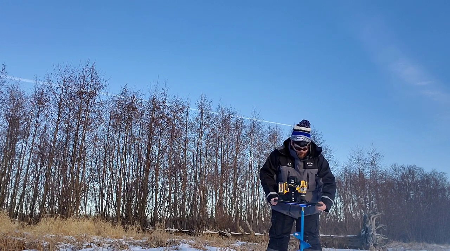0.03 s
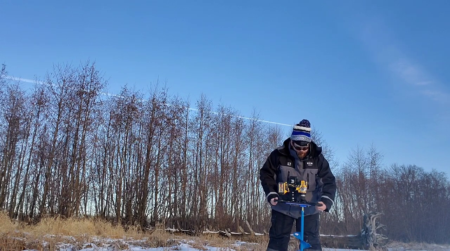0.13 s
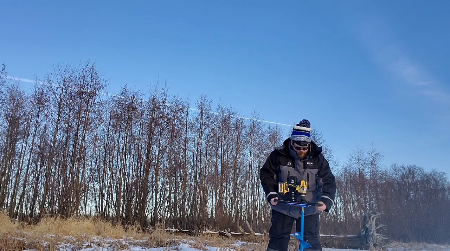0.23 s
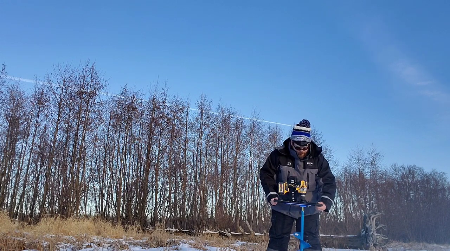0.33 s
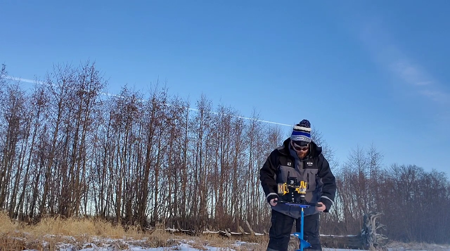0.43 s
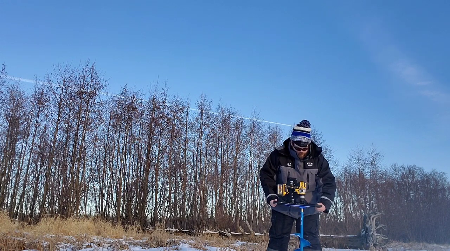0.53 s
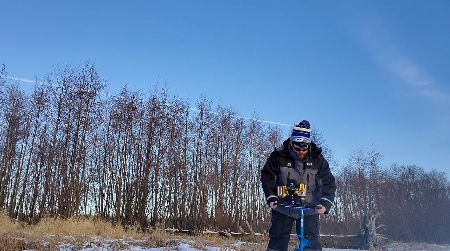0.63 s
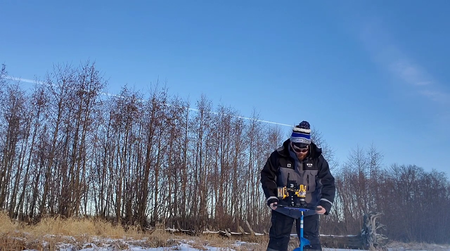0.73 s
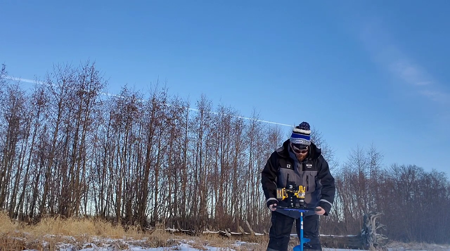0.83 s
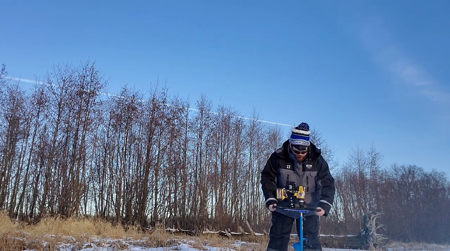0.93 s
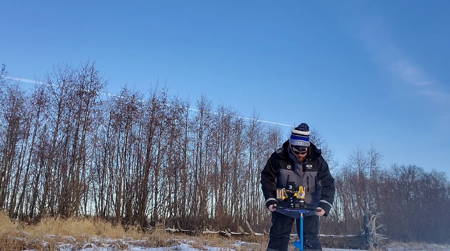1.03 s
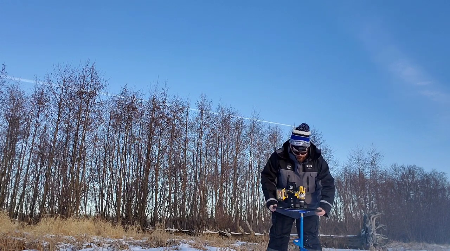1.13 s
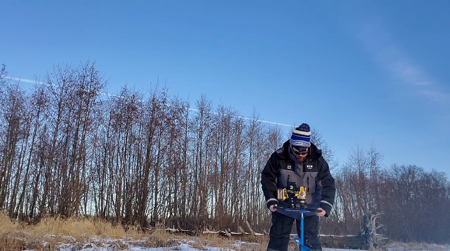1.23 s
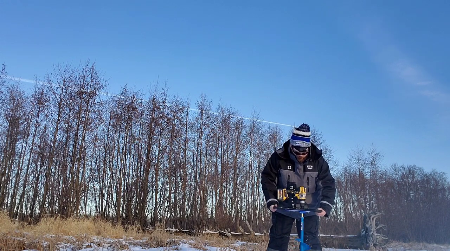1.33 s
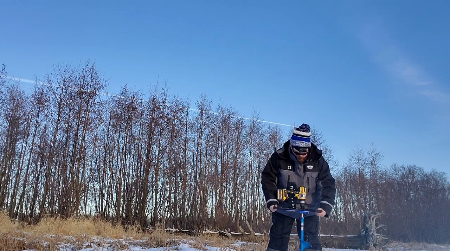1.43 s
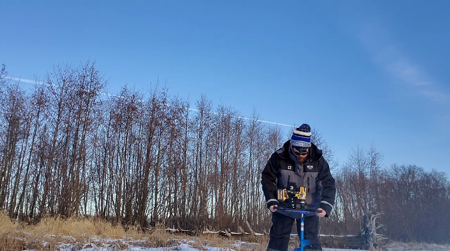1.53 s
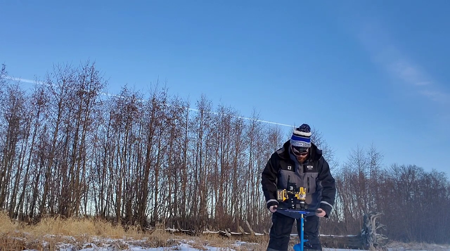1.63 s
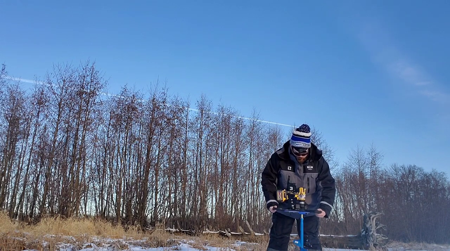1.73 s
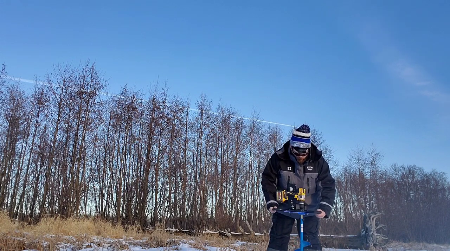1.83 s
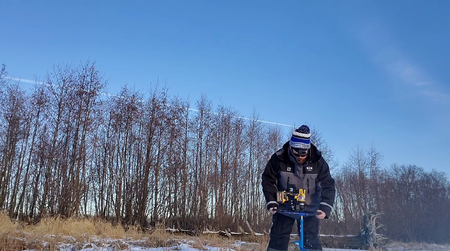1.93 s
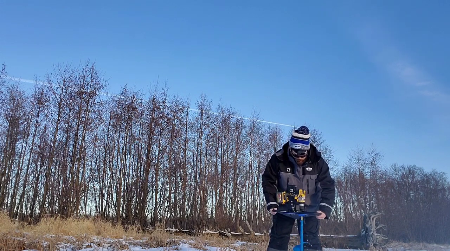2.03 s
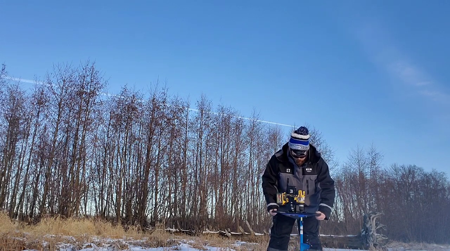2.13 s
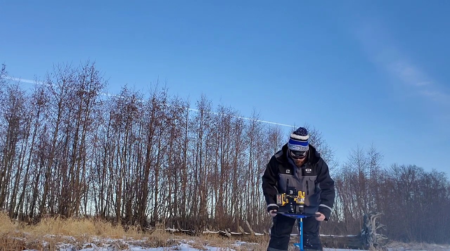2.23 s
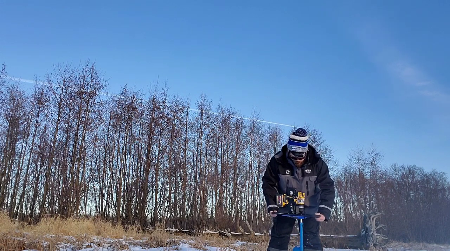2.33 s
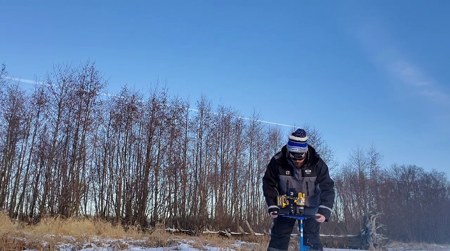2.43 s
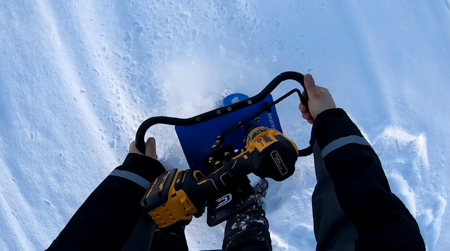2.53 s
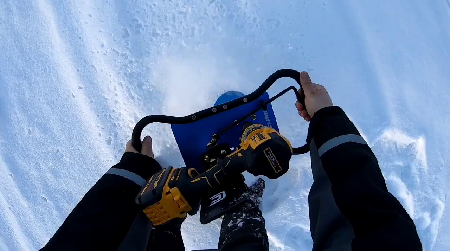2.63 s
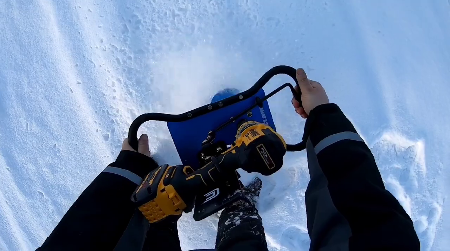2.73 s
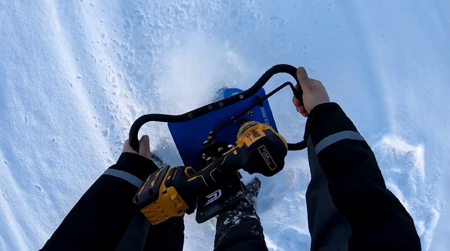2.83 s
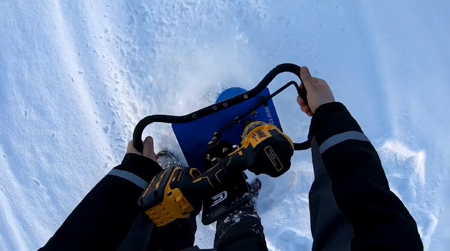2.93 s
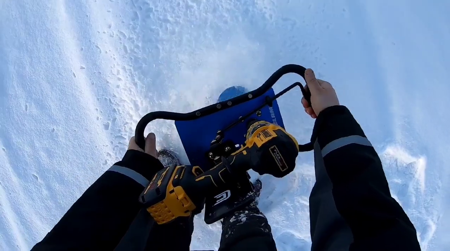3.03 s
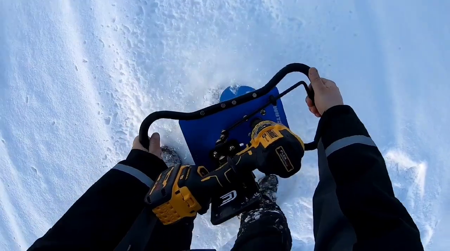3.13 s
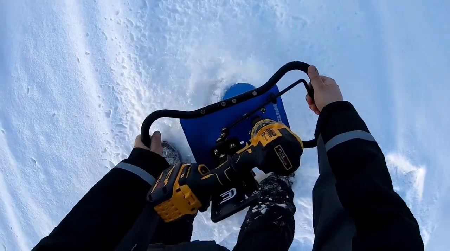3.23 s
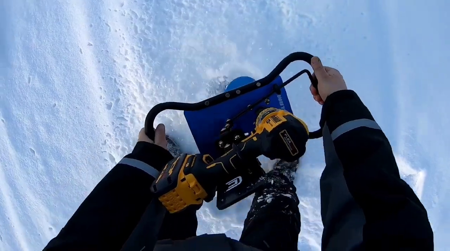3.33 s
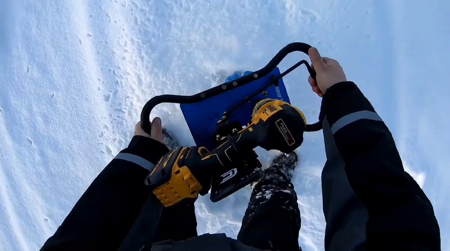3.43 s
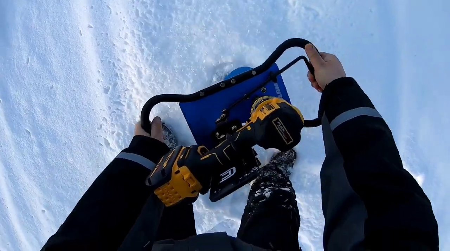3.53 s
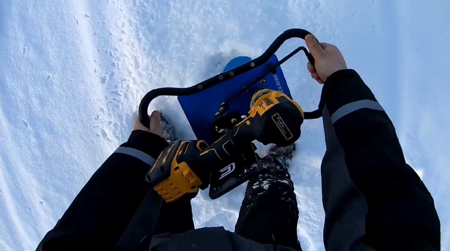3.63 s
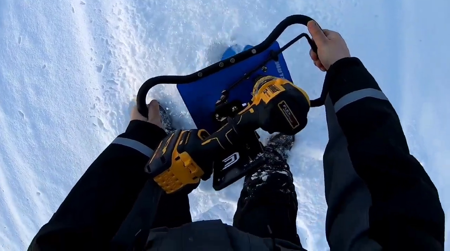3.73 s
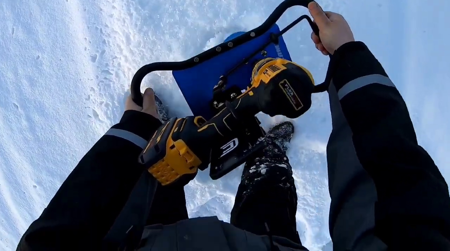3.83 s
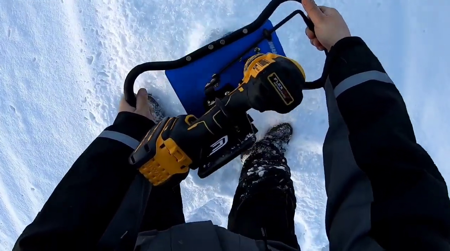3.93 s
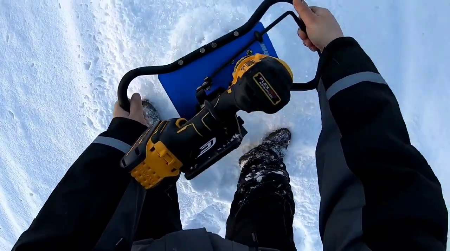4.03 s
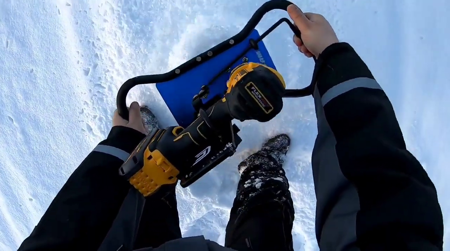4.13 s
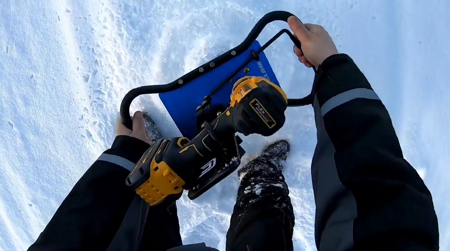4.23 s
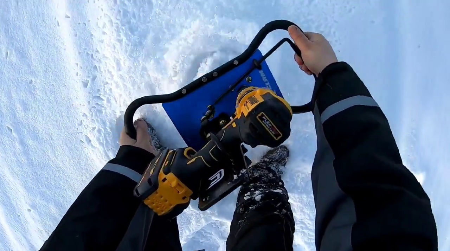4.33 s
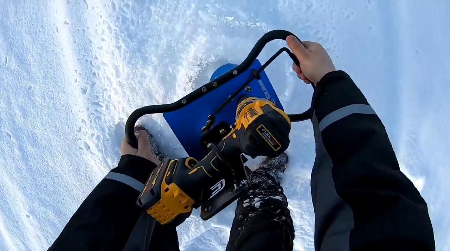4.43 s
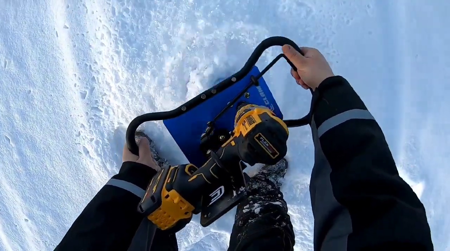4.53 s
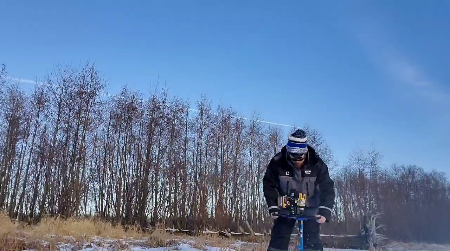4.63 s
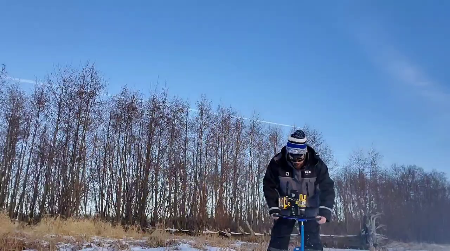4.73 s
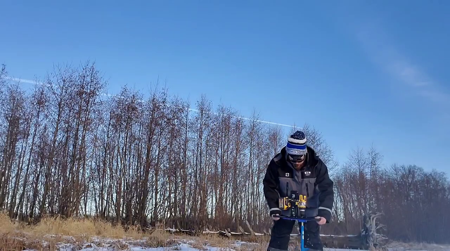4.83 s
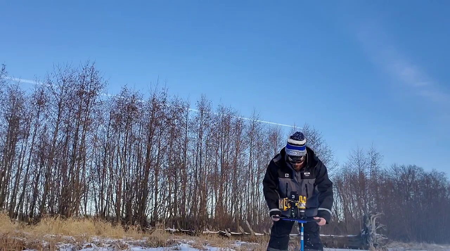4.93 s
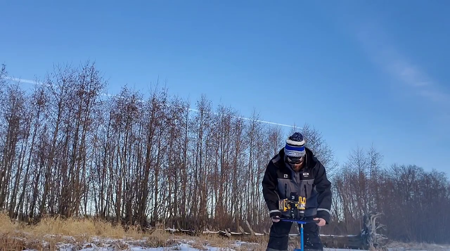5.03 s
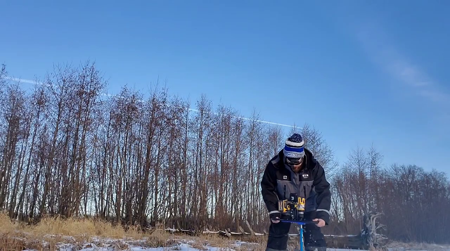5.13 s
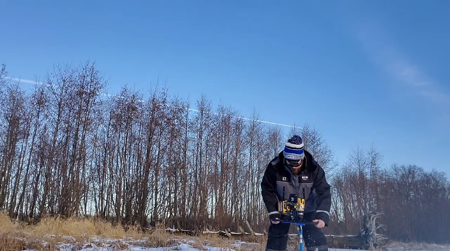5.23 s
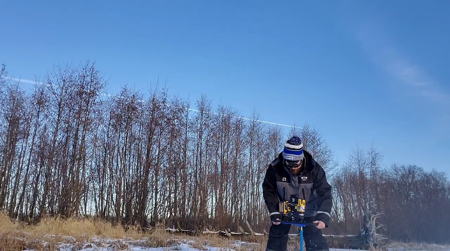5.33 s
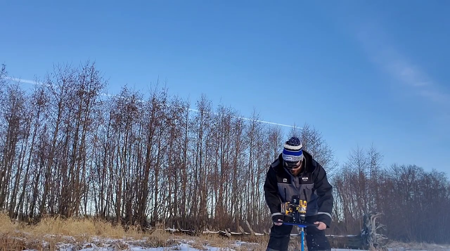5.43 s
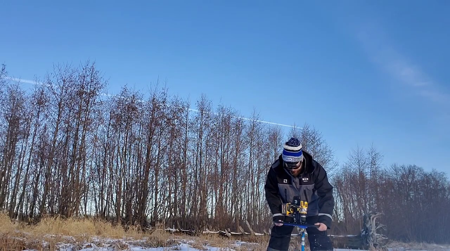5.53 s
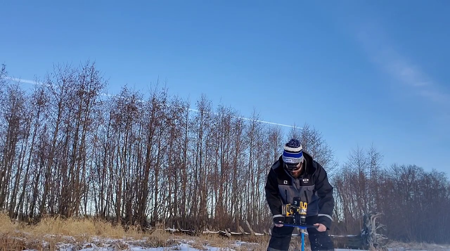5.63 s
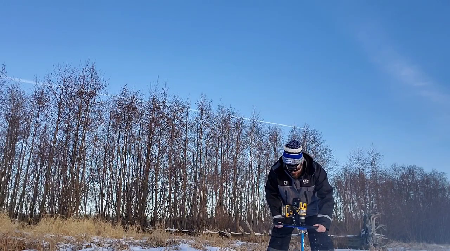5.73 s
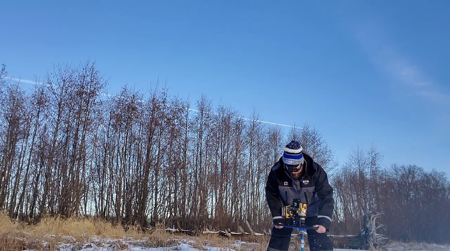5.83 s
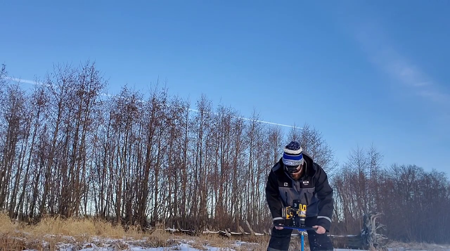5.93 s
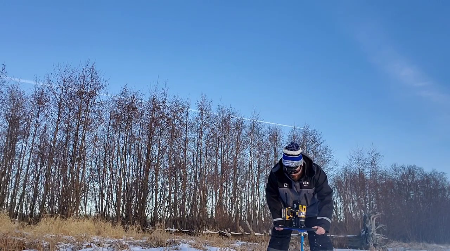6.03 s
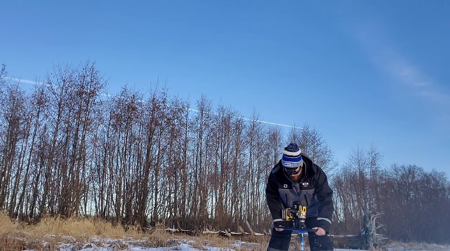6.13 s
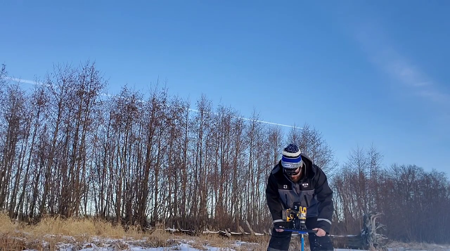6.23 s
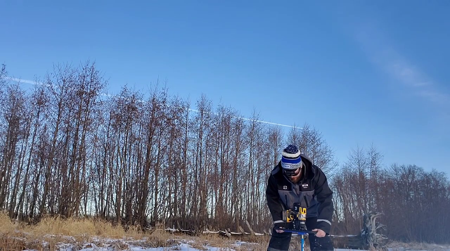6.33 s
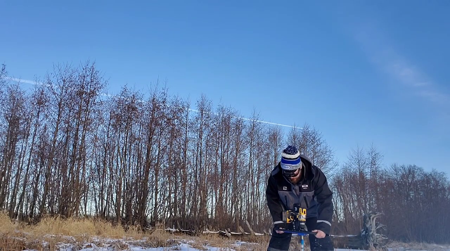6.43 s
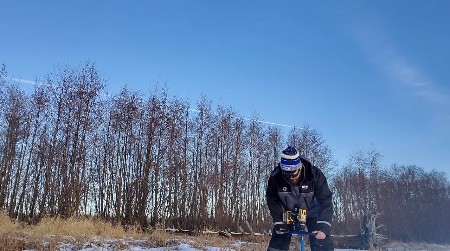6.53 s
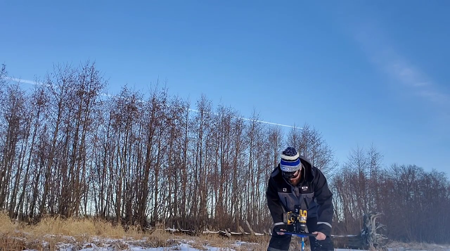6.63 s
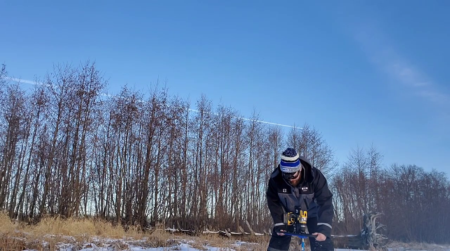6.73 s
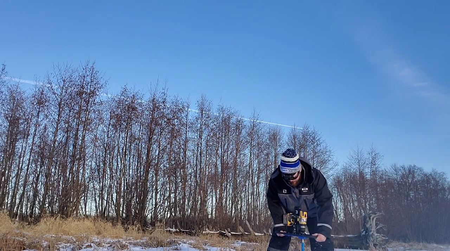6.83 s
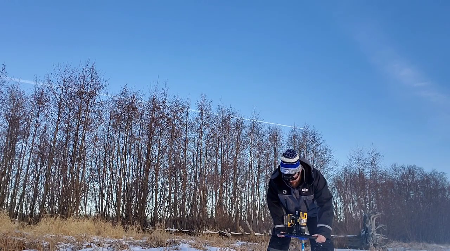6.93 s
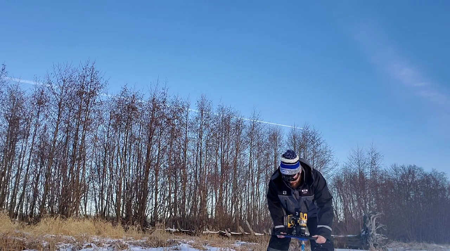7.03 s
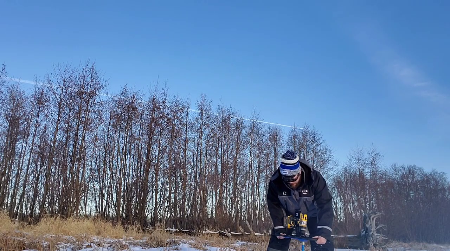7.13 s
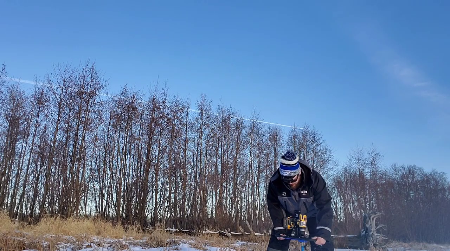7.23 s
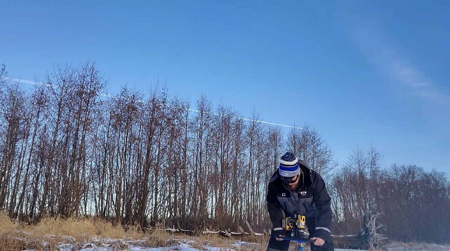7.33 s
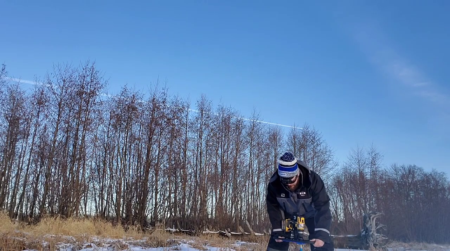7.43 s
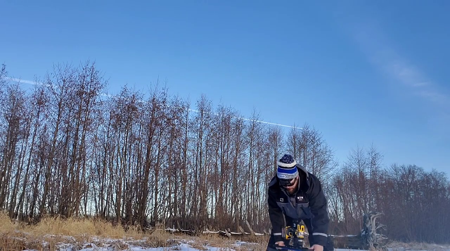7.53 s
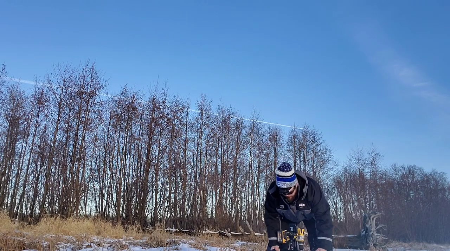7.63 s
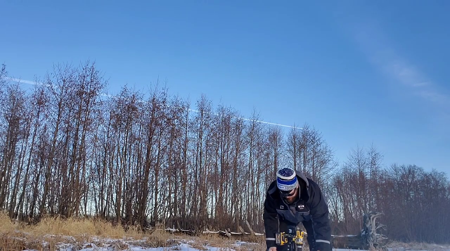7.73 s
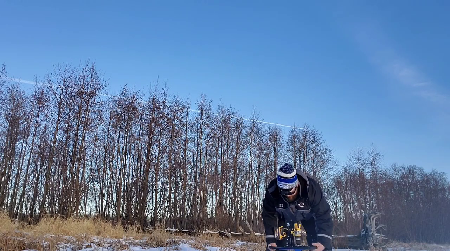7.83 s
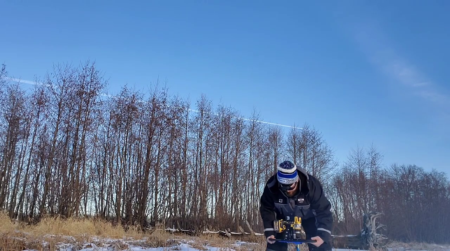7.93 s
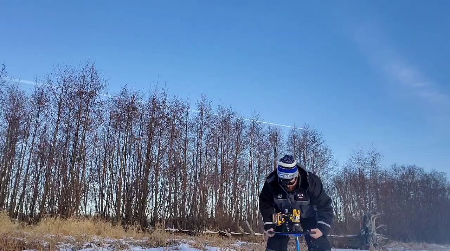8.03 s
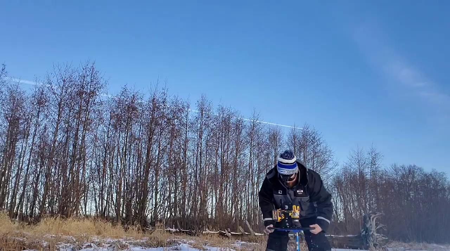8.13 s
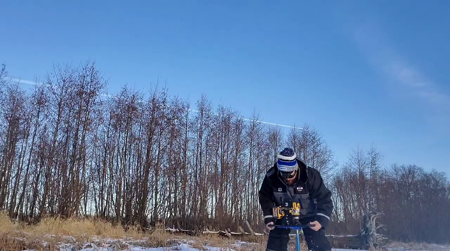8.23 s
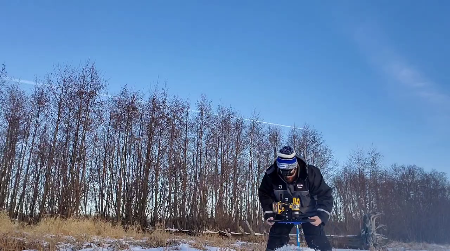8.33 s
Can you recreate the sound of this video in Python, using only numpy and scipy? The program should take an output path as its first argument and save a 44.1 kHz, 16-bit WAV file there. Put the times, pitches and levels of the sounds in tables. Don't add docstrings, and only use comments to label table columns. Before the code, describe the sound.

Distant mono microphone outdoors with a short echo off the ice: faint wind rumble, then an electric drill gathering speed and hissing, crunching ice. Midway, a hard change to close, dull-topped motor roar with chuck rattle and ringing shaft. Back at a distance, thin whine and hollow grinding continue until breakthrough: thumps, slosh, flying ice chips, brief near-silence, motor restart.

```python
import sys
import numpy as np
from scipy import signal
from scipy.fft import rfft, irfft, next_fast_len
from scipy.io import wavfile
from scipy.ndimage import uniform_filter1d

SR = 44100
rng = np.random.default_rng(int(sys.argv[2]) if len(sys.argv) > 2 else 0)


def to_wav(sig):
    pcm = np.clip(np.atleast_2d(sig), -1, 1) * 32767
    pcm = np.round(pcm).astype(np.int16)
    wavfile.write(sys.argv[1], SR, pcm.T)


def ratio(d):
    e = np.asarray(d, float) / 20
    return 10 ** e


N = 370440
TIME = np.arange(N) / SR

# (on [s], off [s])
CUTS = (2.762, 4.926)
# (time [s], level [dB])
WIND = [(0.0, -44.5), (0.5, -46), (0.8, -42), (1.1, -45.5), (1.43, -41.5), (1.95, -42.5), (2.12, -52),
        (2.4, -53), (2.75, -51), (4.93, -48), (5.35, -50), (5.47, -42), (5.65, -51.5), (6.6, -52),
        (7.05, -42), (7.68, -46), (7.85, -42), (8.4, -52)]
# (time [s], motor effort [dB], blade bite [dB])
RUN = [(0.0, -90, -91), (0.28, -85, -91), (0.295, -79, -78), (0.445, -64, -68), (0.46, -47, -61.5),
       (0.55, -50, -61), (0.76, -42.5, -47.5), (1.05, -36, -48.5), (1.58, -37.5, -45.5), (1.66, -32, -40),
       (1.74, -30, -40), (1.755, -27.5, -38), (1.83, -24, -31), (2.25, -20.5, -27), (2.52, -23, -29),
       (2.56, -23, -30.5), (2.6, -25, -28), (2.75, -23, -30.5), (4.93, -23.5, -28.5), (6.1, -24.5, -33),
       (7.6, -26, -34.5), (7.69, -30.5, -41), (7.958, -32.5, -49)]
# (time [s], motor effort [dB], blade bite [dB])
AGAIN = [
    (7.972, -51, -58),
    (8.17, -54, -60),
    (8.22, -60, -67),
    (8.271, -55, -59),
    (8.273, -36, -44),
    (8.365, -32, -48),
]
# (frequency [Hz], width [Hz], lift [dB])
HOUSING = [(2566, 68, 4.5), (2990, 170, -2), (5500, 50, 4), (3870, 89, -3), (4300, 310, 0), (7570, 60, 0.5),
           (9660, 380, -1.5), (10540, 610, 2)]


def evened(x):
    return x / np.sqrt(np.mean(x ** 2) + 1e-20)


def drifting(size, n=N):
    return evened(uniform_filter1d(rng.standard_normal(n), size=size))


def tone(hz):
    return np.sin(2 * np.pi * np.cumsum(hz) / SR)


def read(points, hz):
    f, value = np.transpose(points)
    return np.interp(np.log(hz + 1), np.log(f + 1), value)


def curves(table):
    s, *columns = np.transpose(table)
    return [np.interp(TIME, s, c) for c in columns]


def add(mix, s, sound):
    part = mix[round(s * SR):][:len(sound)]
    part += sound[:len(part)]


def grit(colour, modes=(), per_s=9000, spread_db=3., patchy_db=2.):
    size = ratio(spread_db * np.minimum(rng.exponential(1, N), 4)) * (rng.random(N) < per_s / SR)
    z = signal.stft(size * rng.choice([-1, 1], N), nperseg=1024)[2]
    patches = rng.standard_normal(z.shape[::-1]).T
    patches = evened(uniform_filter1d(uniform_filter1d(patches, size=6, axis=0), size=5, axis=1))
    patchy = signal.istft(z * ratio(patchy_db * patches), nperseg=1024)[1][:N]
    hz = np.fft.rfftfreq(N, 1 / SR)
    shape = ratio(read(colour, hz))
    for f, width, db in modes:
        shape = shape * (1 + (ratio(db) - 1) / (1 + (2 * (hz - f) / width) ** 2))
    return evened(irfft(rfft(patchy) * shape, N))


def rings(hits, t60, rise_s, lift_db):
    out, t = np.zeros(N), np.arange(4000) / SR
    for s, db, hz in hits:
        fall = ratio(db + lift_db - 60 * t / t60)
        add(out, s, fall * (1 - np.exp(-t / rise_s)) * np.sin(2 * np.pi * hz * t))
    return out


def turning(depth_db, uneven):
    turn_hz = 6.5
    wander = drifting(90, N // 100 + 1).repeat(100)[:N]
    angle = 2 * np.pi * np.cumsum(turn_hz * (1 + 0.1684 * wander)) / SR + rng.uniform(0, 1.75)
    return ratio(depth_db * (uneven * np.cos(angle) + np.cos(2 * angle + 1) + .5 * np.cos(4 * angle)))


def once_a_turn(peak_s, swing_db):
    turn_hz = 6.76
    return ratio(swing_db * np.cos(2 * np.pi * turn_hz * (TIME - peak_s)))


def jolts():
    # (time [s], length [s], slosh [dB], spatter [dB])
    jolt_list = [(0.292, .006, -75, -60), (1.216, 0.034, -53.5, -31), (1.627, 0.045, -52, -63),
                 (1.78, 0.082, -48, -57), (2.522, 0.059, -41, -60), (7.657, 0.037, -35, -45),
                 (7.725, 0.041, -35.5, -33), (7.832, 0.026, -36.5, -30), (7.885, 0.029, -32.5, -28),
                 (7.934, 0.025, -39.5, -43), (8.001, 0.03, -43.5, -48), (8.039, 0.015, -40, -38),
                 (8.066, .008, -51, -37), (8.103, 0.025, -45, -50), (8.122, 0.016, -54, -36),
                 (8.156, 0.016, -46.5, -46), (8.224, 0.006, -67, -50), (8.26, 0.1, -50, -50),
                 (8.382, 0.058, -40, -29)]
    rise = 0.5
    out = np.zeros((2, N))
    for s, length, slosh_db, spatter_db in jolt_list:
        u = np.arange(-3 * rise * length, 3 * length, 1 / SR) / length
        bump = np.exp(-(u / np.where(u < 0, rise, 1)) ** 2)
        add(out[0], s + u[0] * length, ratio(slosh_db) * bump)
        add(out[1], s + u[0] * length, ratio(spatter_db) * bump)
    return out


def level(*names):
    # (level [dB], share of effort [-], share of bite [-], gain in dense ice [dB],
    # gain as it deepens [dB/s], level on a slosh [dB], level on a spatter [dB], level under the wind [dB])
    follow = dict(hiss=(0.5, 1, 0, -1, 0, -42, 0, -62), rattle=(0.5, 0.24, 0.7258, 0.5, 0, -32, -19, -60),
              shaving=(0.5, 0, 1, -1, 0.5, -9, -13.5, -58),
              crushing=(-13.5, 0, 0.69, 0.43, 0.68, -2, -25, -13.5),
              shaft=(-1.5, 0, 1.36, 2.5, 3, -9, -37, -30), boom=(-69, 0, 0.2, 23, 6.5, -7, -40, -17.5),
              hollow=(-51.5, 0, 0.4, 20, -0.4, -3, -40, -30))
    dense_s, through_s, enter_s = 5.13, 7.68, .07
    effort, bite = curves(RUN + AGAIN)
    slosh, spatter = jolts() ** 2
    gust = ratio(2 * curves(WIND)[0])
    depth = TIME - dense_s
    dense = np.clip(np.minimum(depth / enter_s, (through_s - TIME) / .02), 0, 1)
    gains = []
    for name in names:
        db, a, b, dense_db, deeper_db, slosh_db, spatter_db, gust_db = follow[name]
        power = ratio(2 * (db + a * effort + b * bite + dense * (dense_db + deeper_db * depth)))
        power = power + ratio(2 * slosh_db) * slosh + ratio(2 * spatter_db) * spatter + ratio(2 * gust_db) * gust
        gains.append(np.sqrt(power))
    return gains


def wind():
    # (frequency [Hz], density [dB/Hz])
    gust_colour = [(15, -46), (25, -17), (48, -5.5), (65, 4.5), (78, -0.5), (97, -6.5), (125, -9.5),
                   (160, -28), (280, -120)]
    return ratio(curves(WIND)[0]) * grit(gust_colour, per_s=4200, spread_db=-1.0, patchy_db=-1.0)


def strays():
    # (time [s], frequency [Hz], level [dB])
    blips = [(3.13, 11110, -54), (3.855, 11200, -50), (3.979, 11250, -51), (4.025, 11100, -49),
             (4.066, 12000, -49), (4.09, 11000, -50), (4.325, 11200, -47), (4.535, 11000, -52),
             (4.58, 11000, -49), (4.625, 10850, -46), (4.71, 11100, -50), (4.752, 11000, -50)]
    out, t = np.zeros(N), np.arange(2600) / SR
    for s, hz, db in blips:
        add(out, s - t[-1] / 2, ratio(db) * np.kaiser(len(t), 9) * np.sin(2 * np.pi * hz * t))
    return out


def off_ice(x):
    # (frequency [Hz], level [dB])
    bounce = [(300, -29.5), (2500, -15), (3800, -7), (4400, -5), (5500, -12), (7000, -6), (9000, -30),
              (12000, -20)]
    delay_s = .00319
    size = next_fast_len(N + SR)
    hz = np.fft.rfftfreq(size, 1 / SR)
    echo = ratio(read(bounce, hz)) * np.exp(-2j * np.pi * hz * delay_s)
    return irfft(rfft(x, size) * (1 - echo) / np.sqrt(1 + abs(echo) ** 2), size)[:N]


def hole():
    # (frequency [Hz], density [dB/Hz])
    boom_colour = [(70, -42), (115, 0), (150, -2), (185, 6.5), (235, -3), (290, -28), (400, -76)]
    hollow_colour = [(170, -47), (240, -3), (300, -2), (390, -7), (450, -11), (600, -70)]
    boom, hollow = level('boom', 'hollow')
    out = boom * grit(boom_colour, per_s=6000, spread_db=3.5, patchy_db=2.0)
    return out + hollow * grit(hollow_colour, per_s=7800, spread_db=2.0, patchy_db=0.0)


def slush():
    # (time [s], peak [dB], treble [dB], thump [Hz])
    slaps = [(7.709, -12, -33, 152), (7.75, -30, -36, 121), (7.818, -10, -33, 171), (7.88, -5.5, -25, 171),
             (7.959, -23, -34, 128), (8.037, -21, -32, 310), (8.069, -32, -41, 229), (8.094, -18, -41, 122),
             (8.119, -24, -40, 240), (8.159, -29, -36, 202), (8.222, -40, -43, 197), (8.273, -21, -27, 217)]
    out, t = np.zeros(N), np.arange(3000) / SR
    for (s, db, treble_db, hz), noise in zip(slaps, rng.standard_normal((len(slaps), 3000))):
        thump = ratio(db - 14.0 - 60 * t / 0.12) * np.sin(2 * np.pi * hz * t) * (1 - np.exp(-t / 0.0056))
        wet = uniform_filter1d(noise, size=24)
        knock = ratio(db - 6.0 - 60 * t / 0.064) * wet * (1 - np.exp(-t / 0.002))
        grains = np.diff(noise, prepend=0)
        spray = ratio(treble_db - 3.5 - 60 * t / 0.032) * grains * (1 - np.exp(-t / 0.00036))
        add(out, s, thump + knock + spray)
    return out


def raps():
    # (time [s], peak [dB], frequency [Hz])
    rim_hits = [(7.668, -21.5, 140), (7.683, -22, 130), (7.714, -31, 330), (7.7374, -19, 300),
                (7.7482, -17, 310), (7.821, -17.5, 280), (7.935, -19, 290), (7.985, -26, 330),
                (7.994, -25, 260), (8.02, -27, 250), (8.097, -27, 260), (8.106, -32, 240)]
    # (time [s], peak [dB])
    chips = [(7.9573, -28), (8.0384, -27), (8.0446, -21), (8.0651, -29), (8.1145, -26), (8.126, -31),
             (8.1354, -28), (8.1624, -33), (8.2227, -33)]
    out, t = np.zeros(N), np.arange(900) / SR
    for s, db, hz in rim_hits:
        add(out, s, ratio(db - 15 * hz * t) * np.sin(2 * np.pi * hz * t))
    for (s, db), noise in zip(chips, rng.standard_normal((len(chips), 900))):
        add(out, s, ratio(db - 11 - 60 * t / 0.022) * np.diff(noise, prepend=0))
    return out


def whine():
    # (time [s], level [dB])
    whine_levels = [(0.5, -71), (1.6, -62), (1.85, -38), (2.75, -34), (4.93, -37), (5.3, -50), (5.65, -31),
                    (5.8, -45), (6.02, -28), (6.12, -38), (6.55, -35.5), (6.66, -32), (6.9, -39),
                    (7.2, -35), (7.55, -35.5), (7.7, -52), (7.96, -60)]
    # (frequency [Hz], level [dB])
    faint_tones = [(2686, -53), (2977, -48), (3289, -61), (3973, -51), (4221, -79), (6035, -52),
                   (6422, -62), (6761, -50.5), (7090, -73), (7359, -52), (7957, -45), (12602, -51)]
    whine_hz, waver_hz = 7370, 28
    jitter, throb = drifting(500), drifting(1300)
    s, db = np.transpose(whine_levels)
    turns = np.cumsum(1 + waver_hz / whine_hz * jitter) / SR
    out = ratio(np.interp(TIME, s, db, -120, -120) + 4.4 * throb) * np.sin(2 * np.pi * whine_hz * turns)
    effort = curves(RUN + AGAIN)[0] + 25
    for k, (hz, line_db) in enumerate(faint_tones):
        own_throb = np.roll(throb, shift=9001 * (k + 1))
        phase = 2 * np.pi * hz * (.4 * turns + .6 * TIME)
        out += ratio(line_db + 1.5 + effort + 3.8 * own_throb) * np.sin(phase)
    return out


def auger():
    # (frequency [Hz], density [dB/Hz])
    shaving_colour = [(1260, -37), (2150, -9.5), (2810, -5.5), (2980, -4), (3340, -6.5), (3790, -11),
                      (4400, -17), (5720, -26), (9680, -120)]
    crushing_colour = [(420, -22.5), (580, -5), (750, -11.5), (860, -5.5), (1300, -6), (1510, -5.5),
                       (1700, -5.5), (1900, -5.5), (2150, -18.5), (2450, -21), (3200, -72)]
    shaft_colour = [(230, -22), (390, -5.5), (409, -8.5), (462, -2), (497, 5), (657, -6), (760, -22),
                    (990, -18), (1670, -120)]
    # (time [s], peak [dB], frequency [Hz])
    squeals = [
        (5.571, -31, 2990),
        (6.37, -34, 3000),
        (6.42, -30, 2990),
        (6.589, -31, 3070),
        (6.731, -24.5, 2990),
        (6.9, -29, 2990),
        (7.049, -25, 2980),
    ]
    shaft_hz = 485
    shaving, crushing, shaft = level('shaving', 'crushing', 'shaft')
    shaved = grit(shaving_colour, HOUSING, per_s=21000, spread_db=2.0, patchy_db=1.5)
    out = shaving * shaved * turning(1.0, 0.79)
    crushed = grit(crushing_colour, per_s=19000, spread_db=2.0, patchy_db=1.8)
    out += crushing * crushed * turning(0.46, 0.59)
    note = tone(shaft_hz + 17 * drifting(1200)) * (TIME < 7.67)
    rough = grit(shaft_colour, per_s=9000, spread_db=1.9, patchy_db=1.5)
    out += shaft * (ratio(-2.5) * rough + ratio(-1.5) * note) * turning(.6, .8)
    t = np.arange(2200) / SR
    for s, db, hz in squeals:
        cry = np.sin(2 * np.pi * hz * t + 1.0 * np.sin(2 * np.pi * 45 * t))
        add(out, s - .025, ratio(db) * np.hanning(len(t)) * cry)
    return out


def drill():
    # (frequency [Hz], density [dB/Hz])
    hiss_colour = [(4590, -42), (7800, -5.5), (9520, 2.5), (13100, 10), (14400, 2.5)]
    rattle_colour = [(2410, -19), (4100, -11.5), (4500, -9.5), (5290, -6), (6410, -5.5), (7590, -2.5),
                     (8400, -3.5), (10900, -15), (18500, -120)]
    # (time [s], frequency [Hz], level [dB])
    mesh = [(5.5, 1724, -58), (5.8, 1692, -50), (6.0, 1660, -47.5), (6.25, 1643, -47), (6.33, 1687, -45.5),
            (6.7, 1650, -42.5), (6.85, 1625, -44.5), (6.95, 1680, -44), (7.15, 1626, -47),
            (7.25, 1730, -45), (7.36, 1740, -46), (7.4, 1645, -41.5), (7.5, 1655, -49), (7.6, 1700, -45),
            (7.66, 1700, -54)]
    # (start [s], end [s], start [Hz], end [Hz], level [dB], waver [Hz])
    restart = [
        (7.615, 7.672, 1680, 950, -33, 130),
        (7.638, 7.664, 2150, 1800, -32, 110),
        (7.612, 7.642, 2440, 2240, -36, 120),
        (7.62, 7.67, 1500, 1300, -35, 200),
        (7.641, 7.672, 1050, 900, -35, 100),
        (8.33, 8.377, 9800, 11050, -31.5, 18),
        (8.284, 8.33, 760, 1710, -42, 17),
        (7.787, 7.83, 2950, 3000, -43, 15),
        (7.7, 7.742, 1580, 1560, -40, 20),
        (8.372, 8.42, 378, 310, -29, 14),
    ]
    planet_hz = 16.45
    hiss, rattle = level('hiss', 'rattle')
    fan = grit(hiss_colour, HOUSING, per_s=30000, spread_db=3.5, patchy_db=2.0)
    out = hiss * fan * turning(0.79, 0.37)
    gears = grit(rattle_colour, HOUSING, per_s=24000, spread_db=3.5, patchy_db=1.5)
    out += rattle * gears * turning(0.91, 0.75)
    s, hz, db = np.transpose(mesh)
    jitter = drifting(700)
    beat = 2 * np.pi * planet_hz * TIME
    swing = 1 + 0.16 * np.cos(beat) + 0.48 * np.cos(2 * beat) + 0.22 * np.cos(4 * beat)
    mesh_gain = ratio(np.interp(TIME, s, db, -120, -120) + 8.5)
    out += mesh_gain * swing * tone(np.interp(TIME, s, hz) + 18 * jitter)
    rasp = evened(jitter - np.roll(jitter, shift=40))
    for start, end, hz0, hz1, db, waver_hz in restart:
        u = np.arange(0, 1, 1 / SR / (end - start))
        chatter = 1 + waver_hz / 110 * rasp[round(end * SR) - SR:][:len(u)]
        waver = waver_hz * jitter[round(start * SR) - SR:][:len(u)]
        glide = tone(hz0 + (hz1 - hz0) * u + waver)
        add(out, start, ratio(db) * chatter * np.sin(np.pi * u) ** 0.24 * glide)
    return out


def chest():
    # (level midway [dB], drift [dB/s], sag at the ends [dB/s^2])
    layers = [
        (-35, -0.1, -0.5),
        (-31.5, 2, 1.8),
        (-33.5, -0.5, 2),
        (-27, -0.3, -0.5),
        (-26.5, -2, 0.5),
        (-30.5, 4.5, 3.5),
        (-31, 0, 0.5),
        (-31, 0, 1),
        (-35.5, -2.5, -1.5),
        (-33.5, -0.5, 1.5),
    ]
    # (frequency [Hz], density [dB/Hz])
    drill_colour = [(520, -41), (880, -31), (1030, -6.5), (1100, -10.5), (1230, -4.5), (1340, -8.5),
                    (1670, -1), (2340, -2.5), (2750, -1.5), (3810, -3.5), (5660, -7), (6260, -11),
                    (7300, -8), (10000, -20), (13000, -62), (22000, -120)]
    shaft_colour = [(220, -23.5), (370, -20), (404, -6.5), (567, 3), (650, -4.5), (799, -1), (906, -12),
                    (950, -7), (1240, -46), (2090, -120)]
    boom_colour = [(12, -65), (20, -32), (54, -32), (67, -13), (89, -5), (129, 1), (184, 3), (319, -4),
                   (400, -5), (520, -61), (880, -120)]
    # (frequency [Hz], width [Hz], lift [dB])
    modes = [(1025, 30, 4.2), (1700, 190, 3), (2760, 130, 1.9), (3356, 86, 5), (4870, 110, 3),
             (5740, 230, 2.4), (7000, 53, 2.7), (7340, 200, 1.5)]
    # (time [s], peak [dB], frequency [Hz])
    catches = [(2.7678, -16.5, 2798), (2.8037, -15, 2720), (2.8651, -30, 2740), (2.905, -27, 2860),
               (2.9679, -18, 2890), (3.0247, -25, 2840), (3.1455, -15, 2780), (3.1978, -19, 2790),
               (3.2569, -17, 2760), (3.298, -12.5, 2760), (3.355, -25, 2760), (3.3956, -19, 2740),
               (3.451, -18, 2720), (3.4927, -16, 2790), (3.564, -16, 2770), (3.6167, -20, 2780),
               (3.6793, -13, 2730), (3.7182, -13.5, 2800), (3.7865, -16, 2790), (3.839, -17, 2700),
               (3.9756, -20, 2870), (4.1402, -16, 2800), (4.1886, -15, 2780), (4.23, -22, 2890),
               (4.3248, -19, 2780), (4.5468, -18, 2780), (4.7089, -19, 2660), (4.783, -17, 2760),
               (4.8508, -13, 2700), (4.907, -16, 2670)]
    kicks = [(2.775, -26, 532), (2.838, -23, 548), (2.903, -25, 541), (3.048, -24, 529),
             (3.107, -21.5, 596), (3.183, -30, 498), (3.267, -30, 557), (3.327, -28, 546),
             (3.399, -23, 561), (3.471, -26, 598), (3.553, -24, 610), (3.729, -24, 551), (3.786, -23, 559),
             (3.868, -28, 568), (3.926, -23, 552), (4.043, -25, 500), (4.123, -20.5, 596),
             (4.244, -20.5, 549), (4.299, -26, 623), (4.353, -32, 491), (4.532, -18, 542),
             (4.681, -34, 564), (4.732, -21, 603), (4.794, -22.5, 531)]
    grinds = [(3.3166, -22, 1700), (3.417, -14, 1690), (3.4809, -21, 1610), (3.5897, -20, 1670),
              (3.757, -22, 1730), (3.906, -23, 1660), (3.9763, -26, 1740), (4.0551, -20, 1790),
              (4.1723, -18, 1700), (4.276, -24, 1850), (4.4043, -28, 1680), (4.4787, -24, 1630),
              (4.5196, -25, 1670), (4.5905, -24, 1770), (4.781, -17, 1700), (4.8777, -23, 1830)]
    whine_hz, whine_db = 2760, -32.5
    u = np.clip(TIME, *CUTS) - np.mean(CUTS)
    gains = [ratio(db + drift_db * u - sag_db * u ** 2) for db, drift_db, sag_db in layers]
    *bands, low, high, boom = gains
    hz = np.fft.rfftfreq(N, 1 / SR)
    body = rfft(grit(drill_colour, modes, per_s=14000, spread_db=3.0, patchy_db=2.0))
    edges_hz = [1450, 1900, 2350, 3100, 5300, 6500]
    above = [1 / (1 + (f / (hz + 1)) ** 24) for f in edges_hz]
    shares = -np.diff([np.ones(N // 2 + 1), *above, np.zeros(N // 2 + 1)], axis=0)
    out = sum(g * evened(irfft(body * share, N)) for share, g in zip(shares, bands))
    out = out * turning(0.34, 0.52)
    out *= once_a_turn(3.055, 1.07 * np.clip(.6 - 0.32 * u, 0, 1))
    waver, throb = drifting(600), drifting(600)
    out += ratio(whine_db - 3.0 + 3.5 * throb) * tone(whine_hz + 38 * waver)
    out += rings(catches, 0.12, .005, 0.)
    out += rings(kicks, 0.24, 0.0091, 0.)
    out += rings(grinds, 0.13, 0.0045, -1.2)
    ring = rfft(grit(shaft_colour, [(566, 60, 0.5)], per_s=5000, spread_db=1.0, patchy_db=1.0))
    upper = hz > 690
    low_ring = low * evened(irfft(ring * ~upper, N)) * once_a_turn(3.09, 2)
    high_ring = high * evened(irfft(ring * upper, N))
    out += (low_ring + high_ring) * turning(0.31, 0.52)
    return out + boom * grit(boom_colour, per_s=3000, spread_db=3.5, patchy_db=-2.5) * turning(0.89, 0.41)


def scene():
    far = off_ice(drill() + auger() + hole() + slush() + raps()) + whine() + wind()
    near = np.clip((TIME - CUTS[0] + .013) / .02, 0, 1) * np.clip((CUTS[1] - TIME) / 0.004, 0, 1)
    far = far * np.where((TIME > 2.7505) & (TIME < np.mean(CUTS)), ratio(-10), 1)
    mix = near * chest() + (1 - near) * far
    return np.array([mix, mix])


def camera(x):
    # (frequency [Hz], level [dB])
    mask = [(60, -60), (110, -15), (170, -7), (300, -8), (800, -11.5), (2000, -11), (3600, -10),
            (4400, -6.5), (4900, -7.5), (5700, -12), (7000, -15), (9700, -15), (10300, -12.5), (10800, -12),
            (11500, -20), (14000, -20)]
    # (from [s], to [s], centre [Hz], half width [Hz], mask lift [dB])
    starved = [(1.85, 2.74, 250, 90, 4), (5.0, 5.2, 190, 60, 6), (7.69, 7.79, 4250, 250, 8),
               (7.76, 7.95, 4550, 250, 7), (7.73, 7.87, 5100, 100, 9), (7.97, 8.11, 5400, 200, 9),
               (8.03, 8.11, 4100, 300, 9), (7.96, 8.33, 4750, 330, -6), (8.11, 8.33, 4700, 700, -4),
               (8.34, 8.4, 4600, 250, 8), (1.8, 2.0, 760, 60, -4), (5.9, 7.5, 750, 45, 3.5),
               (2.0, 2.6, 800, 130, 3), (0.8, 2.7, 2100, 90, 2.5), (5.4, 7.65, 2130, 60, 2.5),
               (8.2, 8.26, 5500, 500, 5)]
    edge_hz, fickle_db, near_db = 14620, 4.5, -5
    hz, t, z = signal.stft(x, SR, nperseg=1024, noverlap=768)
    power = uniform_filter1d(abs(z) ** 2, size=7, axis=1)
    whim = rng.standard_normal((len(t) // 8 + 1, len(hz) // 4 + 1)).T
    whim = whim.repeat(4, axis=0).repeat(8, axis=1)[:len(hz), :len(t)]
    middle = np.outer((hz > 600) & (hz < 9400), (t > CUTS[0]) & (t < CUTS[1]))
    mask_db = read(mask, hz)[:, None] + near_db * middle + fickle_db * whim
    for start, end, mid_hz, half_hz, db in starved:
        mask_db = mask_db + db * np.outer(abs(hz - mid_hz) < half_hz, (t > start) & (t < end))
    kept = uniform_filter1d(power, size=4, axis=0) > power[8:].mean(0) * ratio(2 * mask_db)
    return signal.istft(z * kept * (hz < edge_hz)[:, None], nperseg=1024, noverlap=768)[1][:N]


def low_pass(x):
    return signal.sosfilt(signal.butter(12, 15730, fs=SR, output="sos"), x)


def record(dry):
    hiss_colour = [(1500, -40), (2500, 0), (14000, 0), (14700, -60)]  # (frequency [Hz], density [dB/Hz])
    hiss = ratio(-88) * grit(hiss_colour, per_s=30000, spread_db=1, patchy_db=3)
    mono = camera(dry[0]) + strays() + hiss
    return low_pass(np.array([mono, mono]))


dry = scene()
out = record(dry)
to_wav(out)
```